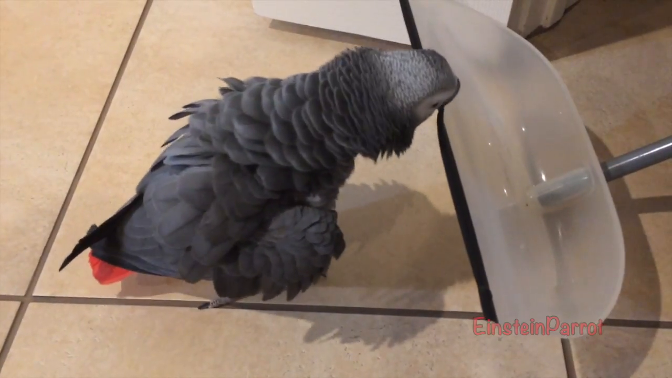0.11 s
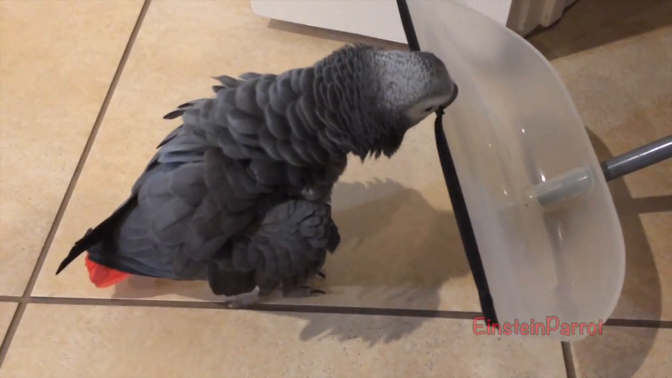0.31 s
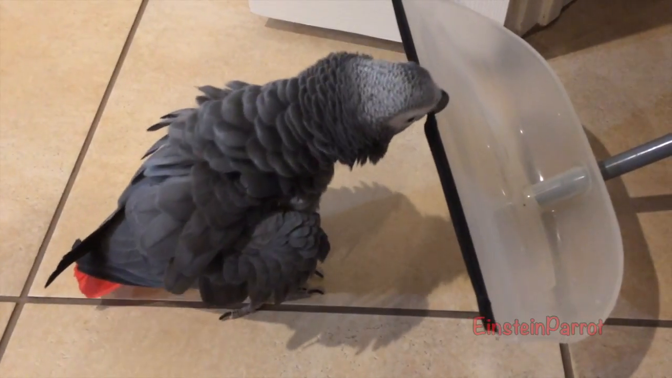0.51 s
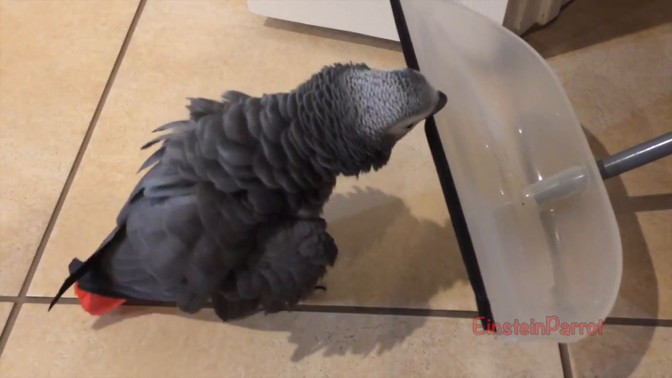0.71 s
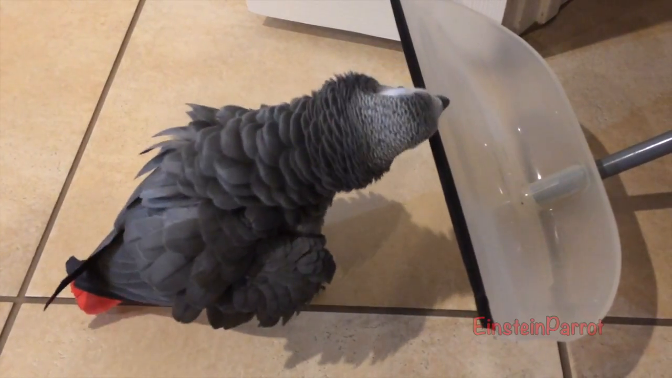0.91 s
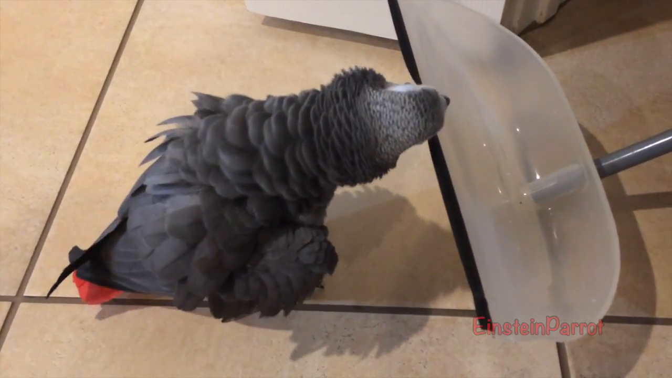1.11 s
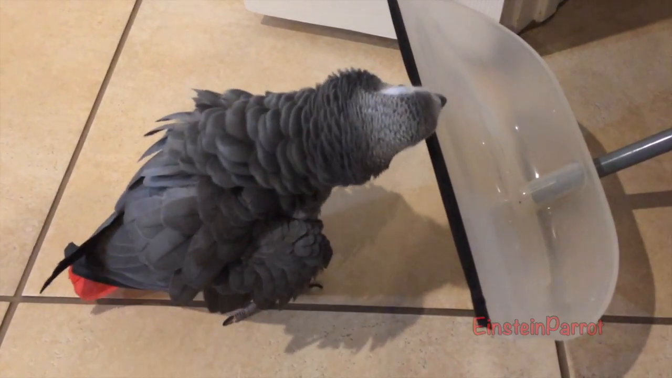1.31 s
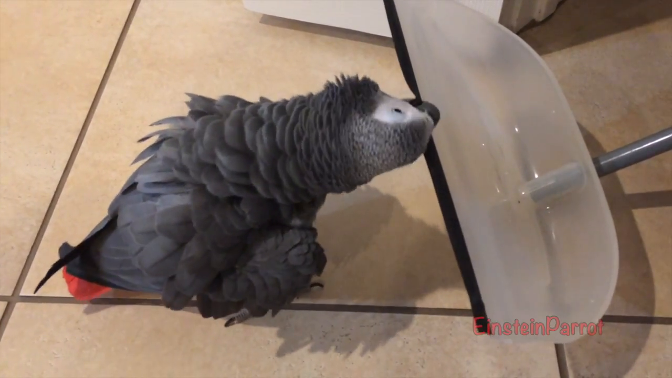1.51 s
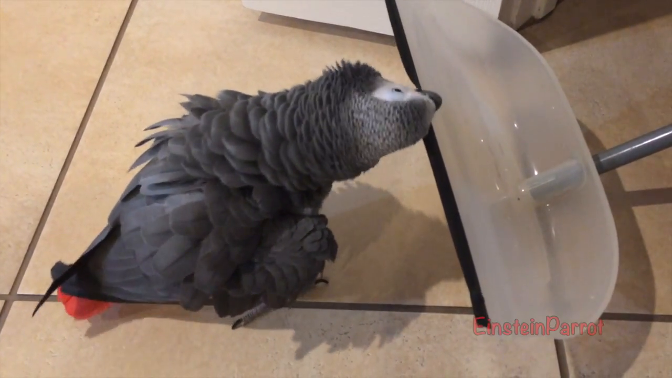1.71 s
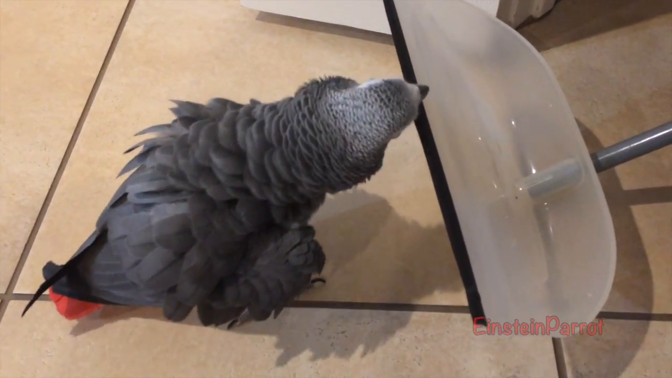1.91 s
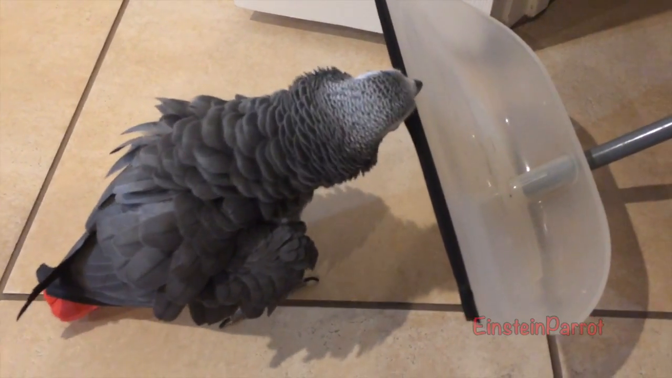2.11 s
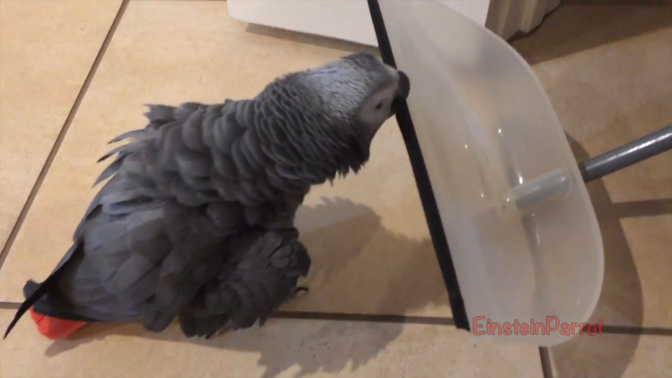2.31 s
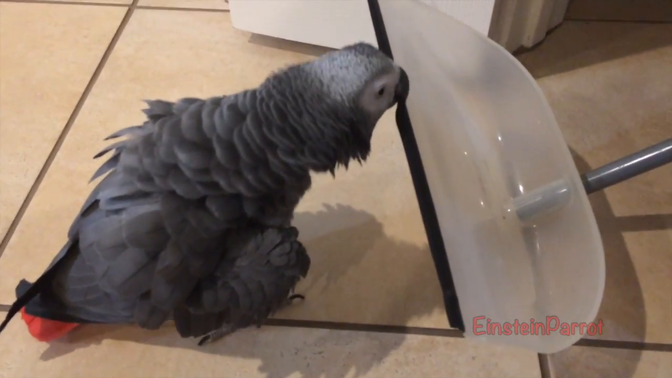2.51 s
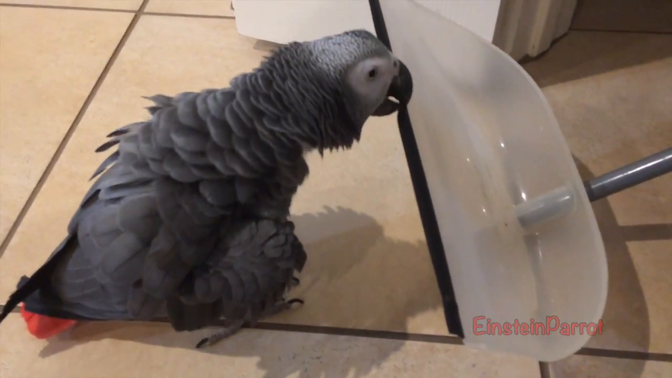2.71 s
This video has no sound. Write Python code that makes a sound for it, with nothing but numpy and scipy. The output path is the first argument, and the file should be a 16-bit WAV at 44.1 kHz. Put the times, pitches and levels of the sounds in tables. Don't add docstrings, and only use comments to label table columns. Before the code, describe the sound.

A parrot growls five times, harsh and rasping, its beak ticking on plastic in a quiet room

```python
import sys
import numpy as np
from scipy import signal
from scipy.fft import rfft, irfft
from scipy.io import wavfile
from scipy.ndimage import uniform_filter1d

SR = 44100
rng = np.random.default_rng(int(sys.argv[2]) if len(sys.argv) > 2 else 0)


def log_audio(samples):
    frames = np.atleast_2d(samples).T
    limited = np.clip(frames, -1, 1)
    pcm = np.round(limited * 32767).astype(np.int16)
    wavfile.write(sys.argv[1], SR, pcm)


def volts(x):
    e = np.asarray(x, float) / 20
    return 10 ** e


N = 123480

SURGE_START_S = [.199, .299, .343, .386, .3945, .432, .476, .513, .522, .538, .548, .561, .579, .643, .681,
                 .689, .704, .72, .736, .757, .923, .975, 1.016, 1.053, 1.103, 1.284, 1.406, 1.451, 1.603,
                 1.625, 1.668, 1.696, 1.735, 1.77, 1.817, 1.867, 1.887, 1.897, 1.923, 1.934, 1.946, 1.954,
                 1.977, 1.988, 2.038, 2.086, 2.122, 2.145, 2.2405, 2.257, 2.268, 2.298, 2.325, 2.369, 2.418,
                 2.62, 2.669, 2.719, 2.776, 2.7875]


def evened(x):
    return x / np.sqrt(np.mean(x ** 2) + 1e-20)


def read(points, hz):
    f, value = np.transpose(points)
    return np.interp(np.log(hz + 1), np.log(f + 1), value)


def highpass(x, hz):
    return signal.lfilter(*signal.butter(2, hz, "high", fs=SR), x)


def resonate(x, hz, width_hz):
    r = np.exp(-np.pi * width_hz / SR)
    if np.ndim(hz) == 0:
        pole = r * np.exp(2j * np.pi * hz / SR)
        return 2 * signal.lfilter([1 - r], [1, -pole], x + 1e-18).real
    turn = np.exp(2j * np.pi * np.cumsum(hz) / SR)
    smooth = signal.lfilter([1 - r], [1, -r], x / turn + 1e-18)
    return 2 * (turn * smooth).real


def bank(x, rows):
    skirt = 3.2
    out = np.zeros(N)
    for k, (hz, width_hz, db) in enumerate(rows):
        ring = resonate(x, hz, width_hz)
        for _ in range(2):
            ring = resonate(ring, hz, width_hz * skirt)
        out += (-1) ** k * volts(db) * ring
    return out


def air():
    # frequency [Hz], level [dB].
    hush = [(25, -9), (70, -9), (200, -7), (600, -12.5), (1300, -10.5), (3000, -32.5), (8000, -36.5),
            (15000, -40)]
    hz = np.fft.rfftfreq(N, 1 / SR)
    noise = irfft(rfft(rng.standard_normal(N)) * volts(read(hush, hz)), N)
    return volts(-55) * evened(noise)


def beats():
    # time [s], rate [pulses/s].
    pace = [(0, 190), (1.25, 190), (1.7, 170), (2, 188), (2.3, 145), (2.8, 122)]
    jitter, pause_periods = .1, .95
    uneven_db, flutter_db, every_other_db = 1, 1.2, -4.5
    starts = np.array([0] + SURGE_START_S + [N / SR])
    period = 1 / np.interp(starts[:-1, None], *np.transpose(pace))
    gaps = (1 + jitter * rng.standard_normal((len(starts) - 1, 100))) * period
    s = starts[:-1, None] + np.cumsum(gaps, 1) - gaps[:, :1] + 1 / SR
    keep = s < starts[1:, None] - pause_periods * period
    count = np.arange(100)
    flutter = flutter_db * evened(uniform_filter1d(rng.standard_normal(s.shape), size=3))
    uneven = uneven_db * np.clip(rng.standard_normal(s.shape), -2, 2)
    size_db = every_other_db * (count % 2) + (flutter + uneven) * (count > 0)
    return (s[keep] * SR).astype(int), volts(size_db)[keep]


def surge(t):
    # jump [dB], hold [s].
    jumps = [(6.5, 0.0086), (5.5, 0.012), (6, 0.0037), (7, 0.0071), (3.5, 0.028), (9, 0.014), (5, 0.0038),
             (6, .003), (-1, 0.0066), (7, 0.0015), (2, 0.0077), (4, 0.0092), (0, 0.0021), (10, 0.015),
             (5.5, 0.0027), (2.5, 0.0027), (3.5, 0.0067), (3, 0.017), (3.5, 0.0041), (3, 0.0029),
             (5, 0.022), (7.5, 0.012), (12, .018), (8.5, 0.023), (8.5, 0.019), (4, 0.0079), (4, 0.0053),
             (6.5, 0.0092), (3.5, 0.0023), (4, 0.0035), (8.5, .006), (6, .008), (4, .003), (4.5, 0.015),
             (5, 0.0046), (1.5, 0.0085), (-1, 0.0023), (0.5, 0.005), (5.5, 0.0035), (1, 0.0027), (5, .003),
             (5.5, 0.0038), (7.5, 0.0045), (6.5, 0.0037), (4, 0.0072), (0.5, .004), (-0.5, .003),
             (6.5, 0.0023), (5.5, 0.0018), (10.5, .003), (7.5, 0.0026), (10.5, 0.02), (11, 0.021),
             (13, 0.0049), (11.5, 0.011), (8.5, 0.0035), (8, 0.0059), (7, 0.0045), (9.5, 0.0032),
             (16, .012)]
    fall_s = .004
    gain_db = np.zeros(len(t))
    for s, (db, hold_s) in zip(SURGE_START_S, jumps):
        gain_db += db * (t >= s) * np.exp(-np.maximum(t - s - hold_s, 0) / fall_s)
    return volts(gain_db)


def folds(at, size, rasp):
    uneven_db, puff_s = 1.6, .0017
    clicks = np.zeros(N)
    clicks[at] = size * volts(uneven_db * np.clip(rng.standard_normal(len(at)), -2, 2))
    puffs = signal.lfilter([1], [1, -np.exp(-1 / (puff_s * SR))], clicks) * rng.standard_normal(N)
    return (1 - rasp) * evened(clicks) + rasp * evened(puffs)


def wander():
    depth, pace_s = .05, .015
    drift = rng.standard_normal(N)
    for _ in range(2):
        drift = uniform_filter1d(drift, size=round(pace_s * SR))
    return 1 + depth * evened(drift)


def parrot():
    # time [s], effort [dB], tongue lift [dB], beak opening [dB], breathiness [dB],
    # throat [Hz].
    growl_1 = [
        (0, -46.5, -13, -36, -18.5, 1440),
        (.2, -40, -29.5, -34, -17, 1037),
        (.36, -38.5, -20, -9.5, -15, 1130),
        (.5, -28, -14, -13, -16.5, 1197),
        (.6, -27.5, -9.5, -2.5, -13, 1076),
        (.632, -38, -9, -16, -19, 1160),
        (.66, -28.5, -10.5, -5, -16, 1120),
        (.765, -28.5, -16, -8, -12.5, 1170),
        (.8, -59, -17, -27, 7, 1140),
    ]
    growl_2 = [
        (0.838, -46.5, -9, -18, -17, 1135),
        (0.89, -36.5, -15, -31, -18.5, 1098),
        (1.014, -37.5, -10.5, -39, -25, 1315),
        (1.124, -37, -15, -38, -19, 1160),
        (1.192, -57, -6, -29, -8, 1325),
    ]
    growl_3 = [
        (1.199, -50.5, -16, -25, -13, 1190),
        (1.264, -39.5, -22.5, -15.5, -25, 1085),
        (1.466, -31.5, -9.5, -35, -16, 1140),
        (1.532, -34.5, -8.5, -40, -17, 1170),
        (1.7, -37, -20.5, -17.5, -19, 1164),
    ]
    growl_4 = [
        (1.722, -34, -13, -9, -18.5, 1220),
        (1.781, -34.5, -12, -7, -19, 1220),
        (1.85, -29.5, -11.5, -20.5, -11.5, 1300),
        (1.89, -23.5, -3, -18.5, -17, 1370),
        (1.948, -31, 0.5, -10.5, -20.5, 1370),
        (2.048, -29, -7.5, -35, -22, 1340),
        (2.161, -34.5, -13.5, -19.5, -13, 1040),
        (2.201, -44.5, -7, -18, -23, 1010),
    ]
    growl_5 = [
        (2.227, -42.5, -22, -11, -15.5, 1020),
        (2.3, -41.5, -16.5, -36.5, -19, 1125),
        (2.419, -42.5, -21, -37, -25, 1200),
        (2.448, -63, -6, -41, -19, 1160),
        (2.6, -69, -45, -12, -38, 1140),
        (2.623, -46, -20, -34, -29, 980),
        (2.76, -40.5, -24, -46, -30, 1000),
        (2.8, -53, -9, -37, -32, 1180),
    ]
    # frequency [Hz], width [Hz], level [dB].
    chest, tongue, beak = [(118, 228, -31), (219, 49, -22.5), (315, 288, -16), (595.5, 94, -9.5),
                           (712, 168, -10.5)], [(1689, 77, 8), (2122, 265, -2.5), (5320, 800, -25.5)], [(2675, 450, -7), (3177, 405, -1.5)]
    # frequency [Hz], width [Hz], level [dB], share of the beak opening followed.
    upper = [(4660, 460, 8.5, 0.036), (5450, 90, -1.5, 0.066), (6380, 1550, 5.5, 0.3), (7890, 500, 9, 0.81),
             (8910, 1440, 0, 0.47), (11700, 3900, -18.5, 0.069)]
    # time [s], tongue pitch factor, beak pitch factor.
    mouth = [(0, 0.95, 1.04), (.3, 0.99, 0.95), (0.549, 1.04, 0.98), (.72, 1.017, 1.04), (.9, 0.99, 1.01),
             (1.3, 0.99, 0.96), (1.6, 1.04, 1.03), (1.78, 1.014, 1.023), (1.93, 1.018, 0.97),
             (2.07, 0.968, 0.99), (2.2, 1, 1.01), (2.8, 1.03, 1.04)]
    # time [s], frequency [Hz].
    notch = [(0, 4290), (1.85, 4070), (1.95, 3640), (2.1, 3550), (2.3, 4110)]
    rasp, upper_rasp = .27, .6
    chest_surge, chest_shut = .6, .3
    throat_split, throat_width_hz = .15, 300
    notch_depth, notch_width_hz = .7, 410

    t, pulses = np.arange(N) / SR, beats()
    swell = surge(t)
    mouth_s, *factors = np.transpose(mouth)
    tongue_factor, beak_factor = (np.interp(t, mouth_s, c) for c in factors)
    row_s, *controls = np.transpose(sorted(growl_1 + growl_2 + growl_3 + growl_4 + growl_5))
    effort_db, tongue_db, beak_db, hiss_db, throat_hz = (np.interp(t, row_s, c) for c in controls)
    throat_hz = throat_hz * wander()

    drive = swell * volts(effort_db + 13)
    throat_in, tongue_in, beak_in = (folds(*pulses, rasp) * drive for _ in range(3))
    chest_gain = swell ** chest_surge * volts(effort_db + 14 - chest_shut * (tongue_db + 13))
    throat = [(throat_hz * (1 + side * throat_split), throat_width_hz, -1.5) for side in (-1, 1)]
    tongue = [(hz * tongue_factor, width_hz, db) for hz, width_hz, db in tongue]
    beak = [(hz * beak_factor, width_hz, db) for hz, width_hz, db in beak]

    voice = bank(folds(*pulses, rasp) * chest_gain, chest)
    voice = voice - bank(throat_in, throat)
    voice = voice + bank(tongue_in * volts(tongue_db + 5), tongue)
    voice = voice + bank(beak_in * volts(beak_db + 4), beak)
    for hz, width_hz, db, share in upper:
        gain = swell * volts(effort_db + hiss_db + 5 + share * beak_db)
        voice = voice + bank(folds(*pulses, upper_rasp) * gain, [(hz, width_hz, db)])
    notch_hz = np.interp(t, *np.transpose(notch))
    return voice - notch_depth * resonate(voice, notch_hz, notch_width_hz)


def taps():
    # start [s], peak level [dB], brightness [dB per octave].
    hits = [
        (0.2206, -21, 6.5),
        (2.498, -30.5, -9.5),
        (2.5277, -18.5, -2.5),
        (2.602, -38, -5),
        (2.742, -35, -9.5),
    ]
    # frequency [Hz], level [dB], t60 [s].
    plastic = [(900, -2, .016), (1250, -1, .014), (1650, 0, .012), (2100, -2, .008), (2700, -4, .006),
               (3400, -4, .005), (4100, -5, .005), (4750, -1, .014), (6300, -13, .003), (8700, -15, .004)]
    tick_db, tick_s = -20, .00059
    rattle_db, rattle_s = -8, .007
    t, out = np.arange(4000) / SR, np.zeros(N + 4000)
    for s, db, bright_db in hits:
        noise = rng.standard_normal(4000)
        sparse = noise * (rng.random(4000) < .06)
        rattle = volts(rattle_db) * np.exp(-t / rattle_s) * sparse + (t == 0)
        ring = np.zeros(4000)
        for hz, mode_db, t60_s in plastic:
            decay = volts(mode_db + bright_db * np.log2(hz / 2000) - 60 * t / t60_s)
            ring += decay * np.sin(2 * np.pi * hz * rng.uniform(1.0, 1.03) * t)
        crack = noise * volts(tick_db + bright_db) * np.exp(-t / tick_s)
        tap = signal.fftconvolve(ring / abs(ring).max(), rattle)[:4000] + crack
        out[round(s * SR):][:4000] += volts(db) * tap
    return out[:N]


def bounce(x):
    # delay [s], share of the direct sound.
    bounces = [(.00135, 0.34), (.00177, 0.079), (.00233, -0.68), (.0032, 0.45)]
    echoes = np.zeros(SR // 100)
    echoes[0] = 1
    for s, share in bounces:
        echoes[round(s * SR)] = share
    return signal.oaconvolve(x, echoes)[:N]


def dustpan(x):
    # frequency [Hz], width [Hz], level [dB].
    modes = [(604, 35, -3), (725, 30, -6), (1018, 27, -2), (1200, 32, -2), (1378, 25, -3), (1460, 30, -1),
             (1702, 30, 2), (1795, 20, -1), (1893, 20, -1), (2190, 35, -1), (2805, 50, -6), (3165, 50, -6)]
    return volts(-4) * sum(volts(db) * resonate(x, hz, width_hz) for hz, width_hz, db in modes)


def room(x):
    # frequency [Hz], t60 [s].
    decay = [(300, 0.61), (1500, 0.3), (5000, 0.33), (12000, 0.053)]
    echoes = np.zeros(SR // 2)
    at = np.arange(200, SR // 2 - 20, 20)
    echoes[at + rng.integers(0, 20, at.shape)] = rng.choice([-1., 1.], at.shape)
    hz, t, z = signal.stft(echoes, SR, nperseg=256)
    fade = volts(-60 * t / read(decay, hz)[:, None])
    tail = signal.istft(z * fade, SR, nperseg=256)[1]
    return volts(-14) * signal.fftconvolve(x, tail / np.linalg.norm(tail))[:N]


def scene():
    near = bounce(highpass(taps(), 600) + 0.79 * highpass(parrot(), 90))
    near = near + dustpan(near)
    return (near + room(near) + air())[None]


def band_limit(x):
    return signal.sosfilt(signal.butter(12, 15960, fs=SR, output="sos"), x)


def record(dry):
    lowpass = signal.firwin(511, 15600, window=("kaiser", 9), fs=SR)
    mix = signal.oaconvolve(highpass(dry, 60), lowpass[None], "same")
    return band_limit(mix)


dry = scene()
out = record(dry)
log_audio(out)
```